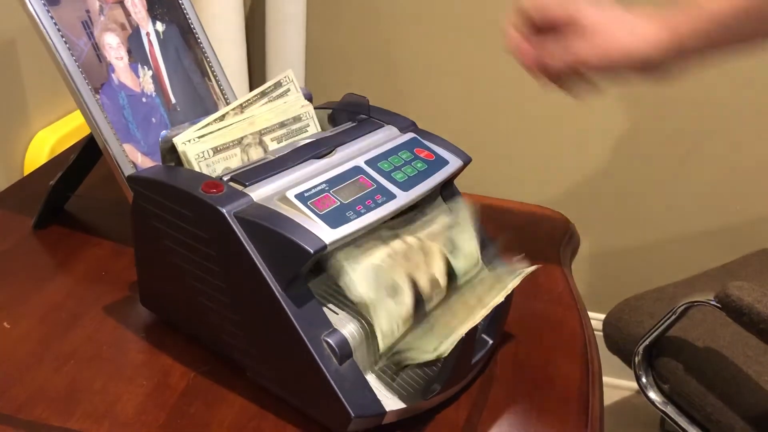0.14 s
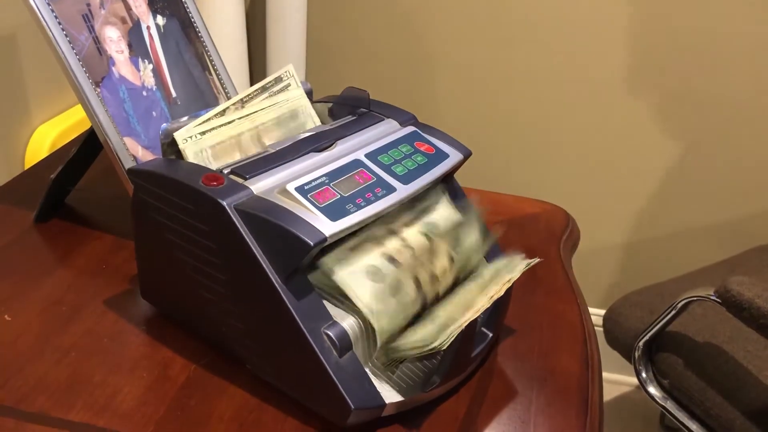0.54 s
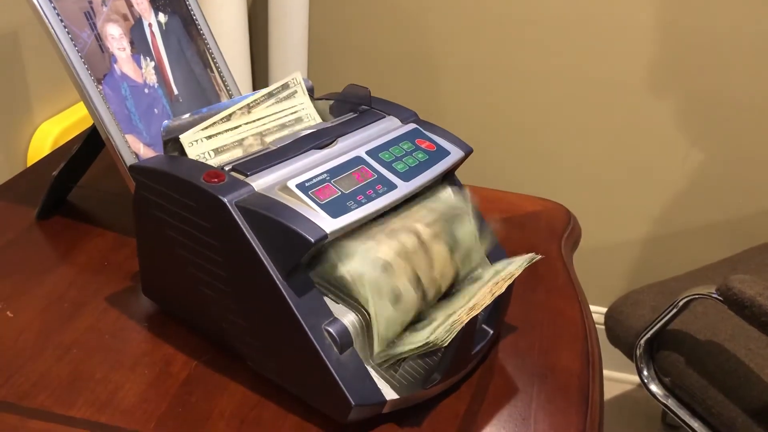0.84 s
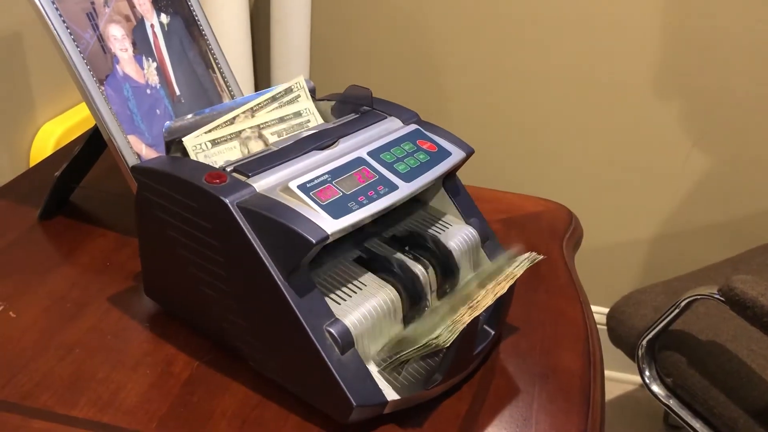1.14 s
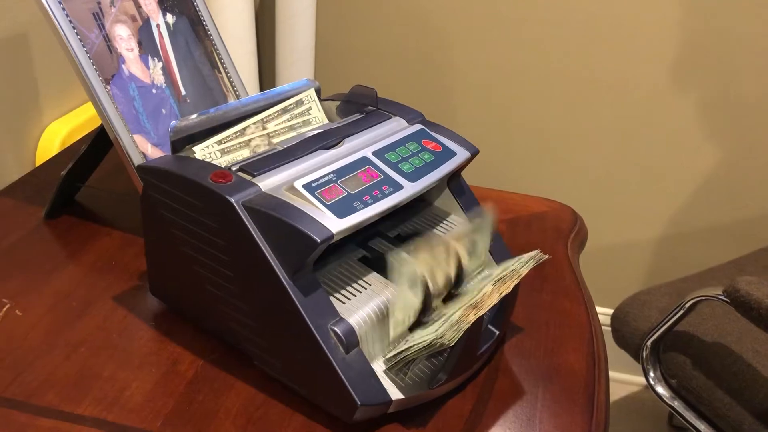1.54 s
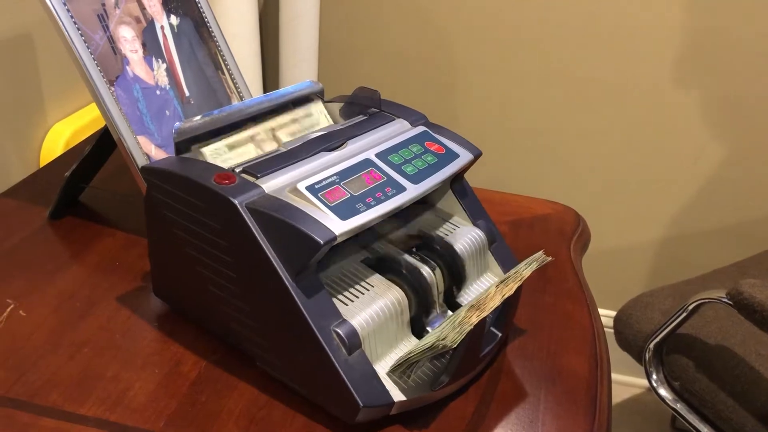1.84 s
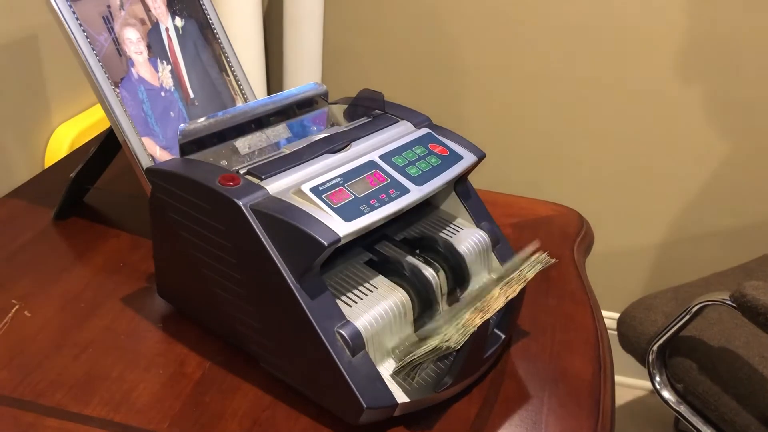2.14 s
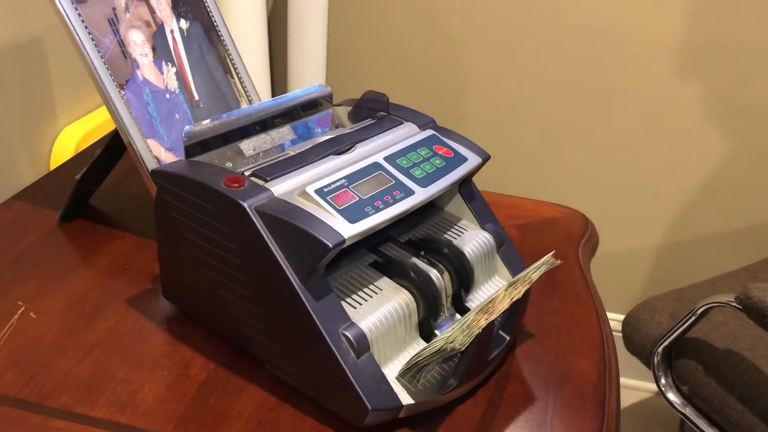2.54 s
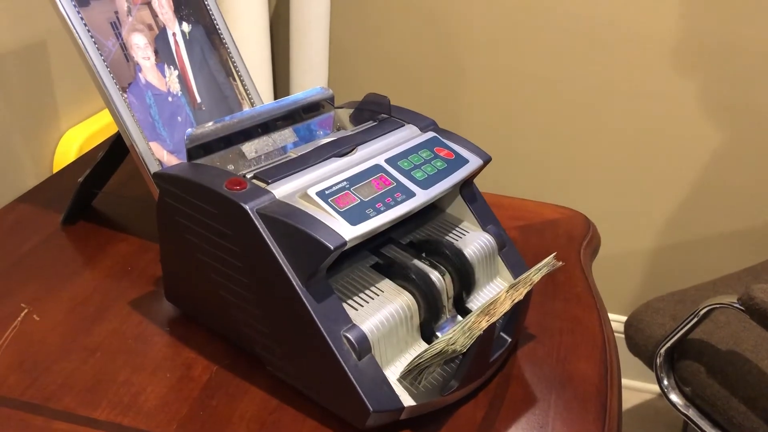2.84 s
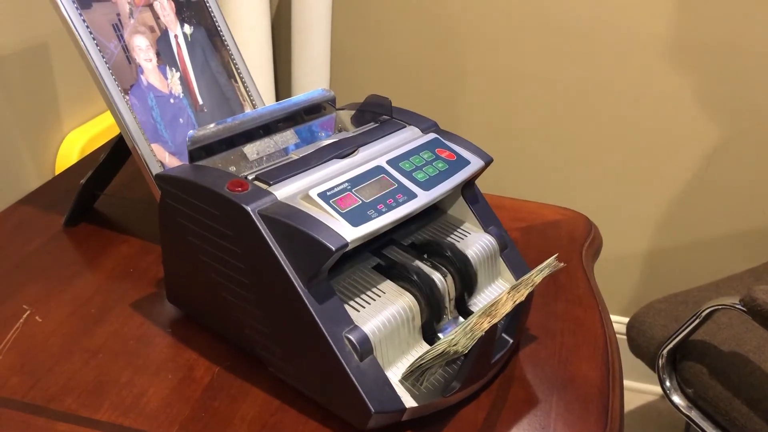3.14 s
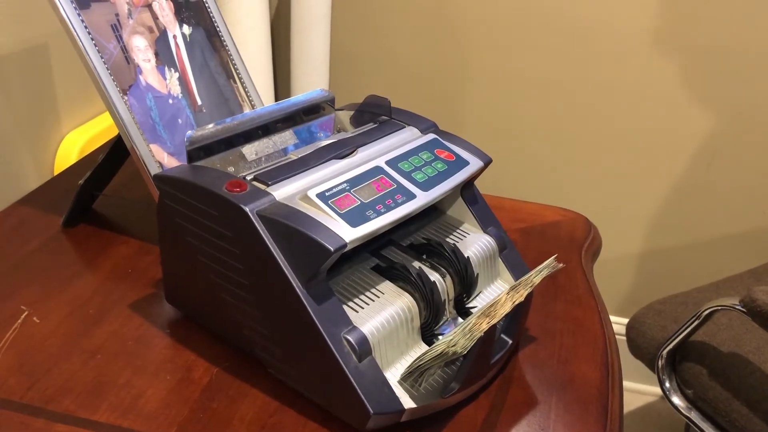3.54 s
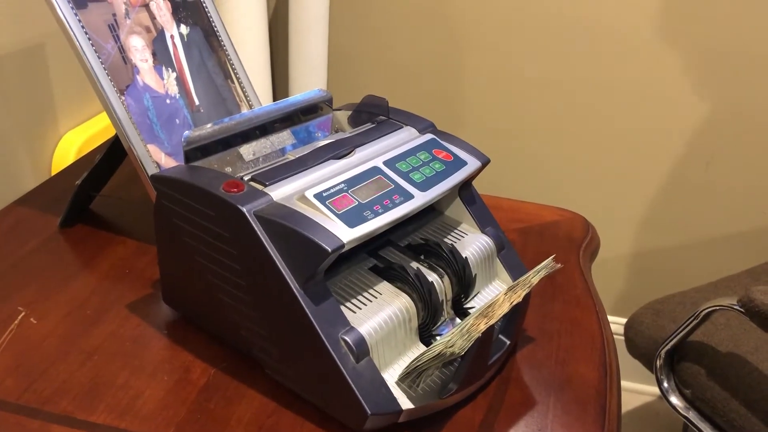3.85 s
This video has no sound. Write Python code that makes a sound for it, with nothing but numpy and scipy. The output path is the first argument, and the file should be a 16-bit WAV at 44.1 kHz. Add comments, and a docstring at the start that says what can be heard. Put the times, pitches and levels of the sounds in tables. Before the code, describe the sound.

Close, dry indoor pickup of a bill counting machine already running; rapid papery snaps thin out, a last cluster lands, rollers rub rhythmically, then the motor slows and faint whirring plastic ticks fade into quiet.

```python
"""A banknote counter, heard from close by in a small room.
Notes riffle and snap through the rollers as crackling noise bursts, over motor hum, belt rattle and whine.
After the last snap the bare rollers rub and scuff as filtered noise; then the hum is cut and the drive slows.
The stacker wheel whirrs on, its blades ticking as short noise bursts that slow and stop.
Near the end one last faint rustle of paper settles."""
import sys
import numpy as np
from scipy import signal
from scipy.fft import rfft, irfft, next_fast_len
from scipy.io import wavfile
from scipy.ndimage import uniform_filter1d, map_coordinates

SR = 44100
rng = np.random.default_rng(int(sys.argv[2]) if len(sys.argv) > 2 else 0)


def inscribe(sig):
    """Save sig as 16-bit PCM at rate SR to the path in sys.argv[1].

    A 1-D sig is mono; a 2-D sig holds one channel per row.
    Samples are clipped to [-1, 1] before scaling.
    """
    pcm = np.round(np.clip(np.atleast_2d(sig).T, -1, 1) * 32767)
    wavfile.write(sys.argv[1], SR, pcm.astype(np.int16))


N = 176400  # samples, 4 s

# Paper rustle. Each row: time in seconds, level in dB.
PAPER_LEVEL = [(0, -28), (.3, -31.5), (.48, -29), (.81, -29.5), (.89, -26.5), (.96, -28), (1.02, -26.5),
               (1.05, -30.5), (1.35, -31.5), (1.48, -37), (1.54, -28.5), (1.6, -37.5), (2.04, -35),
               (2.2, -88)]
# Tone of the paper. Each row: frequency in Hz, relative gain in dB.
PAPER_COLOUR = [(470, -6.5), (800, -6.5), (1050, -7.5), (1300, -2), (1840, -5.5), (2750, -3), (4040, -5.5),
                (4810, -3.5), (10700, -9.5), (14800, -10), (15700, -20)]
# Notes snapping through. Each row: start in seconds, relative level in dB.
SNAPS = [(0.0004, -8.5), (0.0322, -11), (0.0615, -26), (0.0684, -7), (0.091, -6), (0.123, -5),
         (0.1298, -13), (0.15, -9), (0.187, -13), (0.2015, -5), (0.2077, -7), (0.218, -10), (0.2502, -10.5),
         (0.2728, -5.5), (0.31, -11), (0.3326, -9), (0.383, -9.5), (0.432, -8), (0.4524, -11), (0.489, -10),
         (0.515, -11.5), (0.5959, -7), (0.627, -11), (0.652, -11.5), (0.772, -11.5), (0.8698, -15),
         (0.888, -12), (0.9084, -13), (0.948, -17), (0.973, -13), (0.9995, -10.5), (1.0124, -11),
         (1.162, -26), (1.214, -10.5), (1.2394, -14), (1.3165, -9), (1.337, -11), (1.3944, -9.5),
         (1.4194, -11.5), (1.511, -14), (1.533, -19), (1.9389, -10.5), (1.971, -12), (2.007, -14),
         (2.0173, -9.5), (2.034, -9.5), (2.0418, -4)]
# Feed roller speed. Each row: time in seconds, speed in turns per second.
ROLLER_SPEED = [(0, 22.8), (.5, 22.78), (.8, 22.5), (1.1, 23.1), (1.35, 22.9), (1.6, 23.06), (2.54, 23.2),
                (2.68, 18.8), (2.8, 13.6), (2.93, 8)]
# Bare rollers rubbing. Each row: time in seconds, level in dB.
RUB_LEVEL = [(0, -33.5), (1.3, -34), (1.65, -32), (1.9, -32), (2.1, -34), (2.45, -34), (2.55, -38.5),
             (2.6, -51), (2.68, -45.5), (2.75, -59), (2.95, -86)]
# Tone of the rubbing. Each row: frequency in Hz, relative gain in dB.
RUB_COLOUR = [(700, 1.5), (1100, -1), (3600, -6.5), (6200, -2), (7600, -9), (9500, -4), (11000, -10),
              (13000, -12), (15700, -16.5)]
# Resonances of the roller housing. Each row: frequency in Hz, width in Hz, relative gain in dB.
HOUSING = [(1307, 51, 2), (2430, 180, -3), (2827, 190, 1), (4840, 175, 0.5), (5820, 240, -2),
           (6520, 290, -2.5), (10060, 240, -4), (11750, 140, -6)]
# Rollers scuffing the feed pad. Each row: start in seconds, relative level in dB.
SCUFFS = [(2.1031, -18.5), (2.1376, -22), (2.179, -20.5), (2.214, -21), (2.248, -20.5), (2.2893, -20),
          (2.3515, -23), (2.3836, -19), (2.4205, -19), (2.458, -18.5), (2.4947, -22), (2.538, -20.5),
          (2.588, -26), (2.609, -25.5), (2.658, -28)]
# Overall drive fader. Each row: time in seconds, level in dB.
DRIVE_LEVEL = [(0, -31), (.8, -31.5), (1.05, -28.5), (1.4, -30), (1.7, -29), (2.2, -30), (2.45, -29),
               (2.56, -31), (2.7, -38.5), (2.8, -44), (3, -72)]
# Drive whine. Each row: multiple of the roller speed, relative level in dB.
DRIVE_TONES = [(8, -20), (12, -15.5), (16, -19), (18, -8.5), (19, -12.5), (20, -11), (21, -6), (26, -11)]
# Resonances of the plastic case. Each row: frequency in Hz, width in Hz, relative gain in dB.
CASE = [(202, 30, -15.5), (260, 20.3, -8.5), (281.7, 10.4, -7), (384, 23.5, -9.5), (428.7, 26, -4.5),
        (466.2, 47, -1.5), (543, 42, -3), (584, 38, -5), (732, 120, -18), (1326, 43, -18)]
# Tone of the drive rumble. Each row: frequency in Hz, relative gain in dB.
RUMBLE_COLOUR = [(25, -36), (50, -8), (90, 1.5), (160, -2.5), (240, -1), (320, -13.5), (900, 5.5),
                 (1500, -9), (3000, -20)]
# Shudder of the case as the drive slows. Each row: time in seconds, level in dB.
SHUDDER_LEVEL = [(2.5, -75), (2.58, -43), (2.655, -33), (2.71, -45), (2.86, -49.5), (2.98, -73)]
# Stacker wheel. Each row: time in seconds, rate in blades per second, whirr fader in dB.
WHEEL = [(0, 38, -51), (2.75, 37.2, -48), (3, 37.7, -48.5), (3.17, 38.3, -49.5), (3.28, 38, -50),
         (3.4, 27, -51.5), (3.5, 17, -57.5), (3.6, 7.4, -90)]
# Singing of the wheel. Each row: multiple of the blade rate, relative level in dB.
WHEEL_TONES = [(8, -12), (11, -7), (14, -14), (15, -10.5), (16, -15), (17, -11), (27, -13), (31, -15)]
# Tone of the whirr. Each row: frequency in Hz, relative gain in dB.
WHEEL_COLOUR = [(270, -13), (308, 6), (345, -13), (416, 13), (450, 5), (650, -0.5), (900, -10), (1170, -2),
                (1800, -4), (2100, -21), (3100, -10.5), (8000, -30), (15000, -39)]
# Bands of brush hiss. Each row: frequency in Hz, width in Hz, relative gain in dB.
BRUSHES = [(9250, 290, -3), (12450, 490, 0), (13750, 450, -2)]
# Blades flicking the stack. Each row: start in seconds, relative level in dB.
TICKS = [(2.7109, -34.5), (2.7395, -38), (2.765, -36), (2.7912, -34.5), (2.8185, -35.5), (2.8451, -35),
         (2.8715, -38), (2.8986, -38), (2.9255, -37), (2.9523, -42), (2.9782, -39), (3.0035, -41),
         (3.0291, -39.5), (3.0565, -37.5), (3.083, -37), (3.109, -39), (3.1332, -35.5), (3.1595, -32.5),
         (3.1857, -34), (3.2118, -31.5), (3.239, -30), (3.2668, -33.5), (3.2978, -36.5), (3.329, -40.5),
         (3.3637, -44), (3.4027, -38.5), (3.4525, -41)]
# Tone of the ticks. Each row: frequency in Hz, relative gain in dB.
TICK_COLOUR = [(500, -13), (1300, -1.5), (2200, -2), (2550, 4), (2850, 2), (3550, 1.5), (4300, -6),
               (5400, -6), (6500, -7), (8300, -13), (9500, -15), (15000, -22)]
# Tone of the room background. Each row: frequency in Hz, relative gain in dB.
AIR_COLOUR = [(25, -15), (55, -10.5), (95, 0), (130, 2), (220, -7.5), (1000, -12.5), (3000, -26.5),
              (4500, -27), (5600, -33.5), (15700, -41.5)]

FLUTTER_DB, PATCHY_DB = 1.5, 2.5
CRACKLES_PER_S, CRACKLE_SHARE, SNAP_CRACKLE_SHARE = 1600, 0.35, 0.16
SNAP_DB, SNAP_RISE_S, SNAP_T60_S, SNAP_DULL_HZ = -9.5, 0.0012, 0.051, 11300
SNAP_TIP_DB, SNAP_TIP_RISE_S, SNAP_TIP_T60_S = -13.5, 0.0011, 0.0094
STACK_HZ, STACK_WIDTH_HZ, STACK_DB, STACK_FULL_S = 930, 470, -18, 1.0
SETTLE_S, SETTLE_WIDTH_S, SETTLE_DB = 3.9, 0.03, -68
RUB_SWING_DB, HOUSING_SHARE = 2.5, 0.45
SCUFF_DB, SCUFF_RISE_S, SCUFF_T60_S, SCUFF_BRIGHT_HZ = -2, 0.0025, 0.046, 3500
RATTLE_DB, TONES_DB, RUMBLE_DB = -1.77, -0.5, -15.5
KNOCKS_PER_TURN, KNOCK_SHARE, RATTLE_STEADINESS = 3, 0.74, 0.85
HUM_HZ, HUM_DB, CUT_S, HUM_FADE_S = 119.6, -38.5, 2.515, 0.05
SHUDDER_HZ = 260
WHIRR_DB, WHEEL_TONES_END_S = -1.5, 3.28
BRUSH_DB, BRUSH_SWING_DB = -19, 7.5
TICK_DB, TICK_RISE_S, TICK_T60_S, TICK_VARIETY_DB = -6, 0.00097, 0.048, 2.2
TICK_TIP_DB, TICK_TIP_HZ, TICK_TIP_RISE_S, TICK_TIP_T60_S = -13, 5800, 0.00023, 0.011
AIR_DB, AIR_DRONE_HZ, AIR_DRONE_DB = -53.5, 129.1, -56.5
ROOM_T60_S, ROOM_DB = 0.33, -11.5
TOP_HZ = 15800


def amp(db):
    """Decibels to gain."""
    return 10 ** (np.asarray(db) / 20)


def unit(x):
    """Scale to rms 1."""
    return x / np.sqrt(np.mean(x ** 2) + 1e-20)


def seconds():
    """The time of every sample."""
    return np.arange(N) / SR


def curves(rows):
    """One value per sample for each column after the time."""
    s, *columns = np.transpose(rows)
    return [np.interp(seconds(), s, column) for column in columns]


def wobble(rate):
    """A smooth random curve, rate knots a second."""
    knots = rng.standard_normal(int(N * rate / SR) + 4)
    return map_coordinates(knots, [np.arange(N) * rate / SR])


def filtered(x, response):
    """x times a response of frequency."""
    m = next_fast_len(N + SR // 2)
    return irfft(rfft(x, m) * response(np.fft.rfftfreq(m, 1 / SR)), m)[:N]


def coloured(x, points):
    """x shaped by (Hz, dB) points, rolled off below the first, at rms 1."""
    f, db = np.transpose(points)

    def response(hz):
        return amp(np.interp(np.log(hz + 1), np.log(f), db)) * np.minimum(hz / f[0], 1) ** 2

    return unit(filtered(x, response))


def ringing(x, modes):
    """x through parallel resonances of alternating polarity, at rms 1."""
    def response(f):
        total = 0
        for k, (centre, width, db) in enumerate(modes):
            band = 1j * f * width / (centre * centre - f * f + 1j * f * width)
            total = total + (-1) ** k * amp(db) * band
        return total

    return unit(filtered(x, response))


def noise():
    """White noise."""
    return rng.standard_normal(N)


def narrow(hz, width_hz):
    """A bell-shaped band of noise at rms 1."""
    return unit(filtered(noise(), lambda f: np.exp(-((f - hz) / width_hz) ** 2)))


def blend(a, b, share):
    """Mix by power, share going to b."""
    share = np.clip(share, 0, 1)
    return np.sqrt(1 - share) * unit(a) + np.sqrt(share) * unit(b)


def bursts(rows, rise_s, t60_s):
    """Envelope of blows that rise and die away, overlaps adding in power."""
    power, t = np.zeros(N + SR), np.arange(SR // 4) / SR
    shape = (1 - np.exp(-t / rise_s)) * 10 ** (-3 * t / t60_s)
    for s, db in rows:
        start = max(round(s * SR), 0)
        power[start:][:len(t)] += (amp(db) * shape) ** 2
    return np.sqrt(power[:N])


def tones(turns, orders, drift, waver_db):
    """Multiples of a shaft's rotation, slightly unsteady in phase and level."""
    total = np.zeros(N)
    for k, db in orders:
        level = np.sqrt(2) * amp(db + waver_db * wobble(5))
        phase = 2 * np.pi * (k * turns + rng.random()) + drift * wobble(8.1)
        total += level * np.sin(phase)
    return total


def patchy(x, depth_db):
    """x with a colour that changes from moment to moment."""
    z = signal.stft(x, nperseg=256)[2]
    field = uniform_filter1d(rng.standard_normal(z.shape), size=7, axis=0)  # smooth over frequency
    field = uniform_filter1d(field, size=6, axis=1)  # and over time
    return signal.istft(z * amp(depth_db * unit(field)), nperseg=256)[1][:N]


def notes(turns):
    """Notes flutter through the rollers, snap into the stacker and finally settle."""
    t = seconds()
    level_db, = curves(PAPER_LEVEL)
    flutter_db = FLUTTER_DB * (np.sin(2 * np.pi * turns) + wobble(90)) / 2
    settle = amp(SETTLE_DB) * np.exp(-((t - SETTLE_S) / SETTLE_WIDTH_S) ** 2)
    rustle = (amp(level_db + flutter_db) + settle) * crackle(CRACKLE_SHARE)

    snap_envelope = bursts(SNAPS, SNAP_RISE_S, SNAP_T60_S)
    snaps = snap_envelope * crackle(SNAP_CRACKLE_SHARE)
    snaps = filtered(snaps, lambda hz: 1 / np.hypot(1, (hz / SNAP_DULL_HZ) ** 2))
    # the edge strikes first: a shorter burst
    tips = bursts(SNAPS, SNAP_TIP_RISE_S, SNAP_TIP_T60_S) * coloured(noise(), PAPER_COLOUR)
    # a thicker stack gives each landing more body
    stack = np.clip(t / STACK_FULL_S, 0, 1)
    slaps = stack * snap_envelope * narrow(STACK_HZ, STACK_WIDTH_HZ)
    return rustle + amp(SNAP_DB) * snaps + amp(SNAP_TIP_DB) * tips + amp(STACK_DB) * slaps


def crackle(share):
    """Paper: tiny buckling clicks over sliding hiss, its colour shifting as the sheet bends."""
    clicks = (rng.random(N) < CRACKLES_PER_S / SR) * rng.uniform(0.2, 1, N)
    grains = signal.fftconvolve(clicks, np.exp(-np.arange(64) / 10))[:N] * noise()
    return coloured(patchy(blend(noise(), grains, share), PATCHY_DB), PAPER_COLOUR)


def friction():
    """Rubber sliding: coloured noise blended with noise ringing the roller housing."""
    return blend(coloured(noise(), RUB_COLOUR), ringing(noise(), HOUSING), HOUSING_SHARE)


def rollers(turns):
    """Rubber rollers rub twice a turn, and scuff the feed pad once no paper is left."""
    level_db, = curves(RUB_LEVEL)
    swing_db = RUB_SWING_DB * np.sin(4 * np.pi * turns)
    rub = amp(level_db + swing_db) * friction()
    scuffs = amp(SCUFF_DB) * bursts(SCUFFS, SCUFF_RISE_S, SCUFF_T60_S) * friction()
    return rub + filtered(scuffs, lambda hz: hz / np.hypot(hz, SCUFF_BRIGHT_HZ))


def belt_rattle(turns):
    """The belt knocks the case several times a turn and its resonances ring."""
    knocks = np.diff(np.floor(turns * KNOCKS_PER_TURN), prepend=0) * amp(3.2 * noise())  # uneven force
    knocks = signal.fftconvolve(knocks, np.hanning(SR // 250))[:N] * noise()  # 4 ms each
    rattle = ringing(blend(noise(), knocks, KNOCK_SHARE), CASE)
    # trim below 150 Hz and above 2500 Hz
    rattle = filtered(rattle, lambda hz: 1 / (1 + (150 / (hz + 1)) ** 6) / (1 + (hz / 2500) ** 2))
    # every turn carries much the same energy
    power = np.abs(uniform_filter1d(rattle ** 2, size=SR // 35)) + 1e-9
    rattle = unit(rattle / power ** (RATTLE_STEADINESS / 2))
    # the knocks soften as the belt slows, leaving the falling tones
    speed, = curves(ROLLER_SPEED)
    return rattle * speed / speed.max()


def drive(turns):
    """The belt drive rattles, rumbles and sings at multiples of the roller speed."""
    level_db, = curves(DRIVE_LEVEL)
    rattle = amp(RATTLE_DB) * belt_rattle(turns)
    whine = amp(TONES_DB) * tones(turns, DRIVE_TONES, drift=0.2, waver_db=3.5)
    rumble = amp(RUMBLE_DB) * coloured(noise(), RUMBLE_COLOUR)
    return amp(level_db) * (rattle + whine + rumble)


def motor():
    """Mains hum until the power is cut, then a wavering tone as a case resonance shudders."""
    t = seconds()
    power_on = np.clip(1 - (t - CUT_S) / HUM_FADE_S, 0, 1)
    hum = np.sqrt(2) * np.sin(2 * np.pi * HUM_HZ * t) * power_on
    shudder_db, = curves(SHUDDER_LEVEL)
    shudder = np.sqrt(2) * np.sin(2 * np.pi * SHUDDER_HZ * t + wobble(20))
    return amp(HUM_DB + 0.76 * wobble(5.5)) * hum + amp(shudder_db) * shudder


def stacker():
    """A small motor whirrs and its brushes hiss; the wheel's blades flick the stack, slowing to rest."""
    rate, level_db = curves(WHEEL)
    blades = np.cumsum(rate) / SR
    singing = np.clip((WHEEL_TONES_END_S - seconds()) * 10, 0, 1)  # fades out over 0.1 s
    song = singing * tones(blades, WHEEL_TONES, drift=0.23, waver_db=1.5)
    whirr = amp(WHIRR_DB) * coloured(noise(), WHEEL_COLOUR)
    brush_db = BRUSH_DB + BRUSH_SWING_DB * np.sin(4 * np.pi * blades)
    brushes = amp(brush_db) * ringing(noise(), BRUSHES)

    tick_noise = coloured(patchy(noise(), depth_db=TICK_VARIETY_DB), TICK_COLOUR)
    ticks = bursts(TICKS, TICK_RISE_S, TICK_T60_S) * tick_noise
    # the blade's first contact: a shorter, brighter burst
    tips = bursts(TICKS, TICK_TIP_RISE_S, TICK_TIP_T60_S) * narrow(TICK_TIP_HZ, width_hz=3900)
    return amp(level_db) * (whirr + song + brushes) + amp(TICK_DB) * ticks + amp(TICK_TIP_DB) * tips


def room(x):
    """A short, soft answer from the walls: decaying noise after a 4 ms gap."""
    t = np.arange(SR // 2) / SR
    tail = rng.standard_normal(len(t)) * 10 ** (-3 * t / ROOM_T60_S) * (t > 0.004)
    return x + amp(ROOM_DB) * signal.fftconvolve(x, tail / np.linalg.norm(tail))[:N]


def room_air():
    """Steady background: soft coloured noise and a narrow, drone-like band."""
    drone = narrow(AIR_DRONE_HZ, width_hz=7.1)
    return amp(AIR_DB) * coloured(noise(), AIR_COLOUR) + amp(AIR_DRONE_DB) * drone


def scene():
    """The machine over a faint room drone, alike in both channels."""
    turns = np.cumsum(curves(ROLLER_SPEED)[0]) / SR
    echoing = room(notes(turns) + rollers(turns) + stacker())
    mono = echoing + drive(turns) + motor() + room_air()  # drive and motor stay dry
    return np.array([mono, mono])


def record(dry):
    """Nothing is kept above the band limit."""
    return np.array([filtered(x, lambda hz: hz < TOP_HZ) for x in dry])


dry = scene()
out = record(dry)
inscribe(out)
```